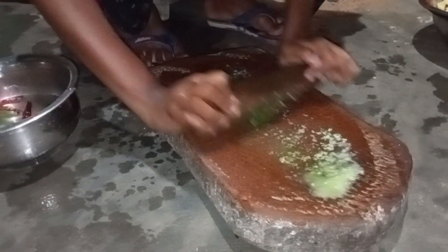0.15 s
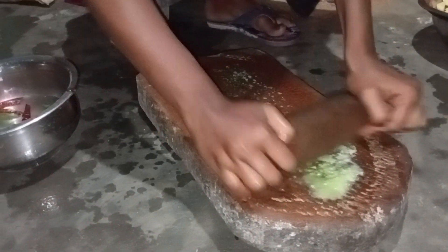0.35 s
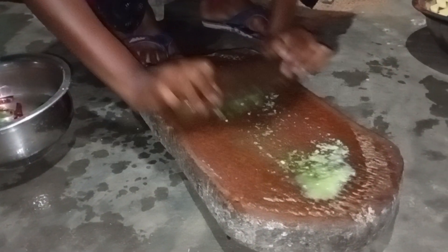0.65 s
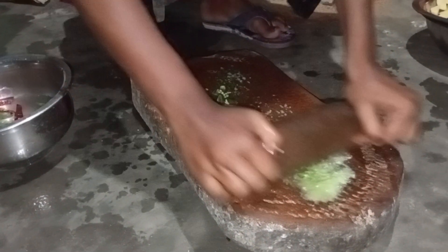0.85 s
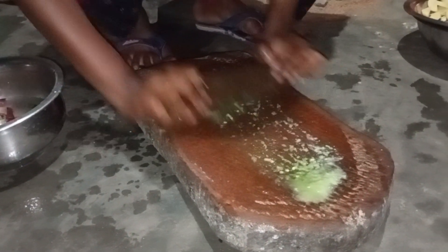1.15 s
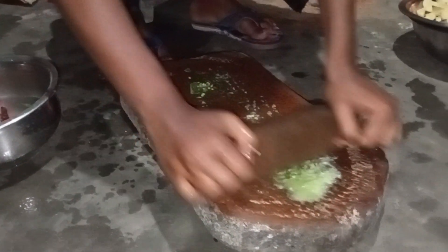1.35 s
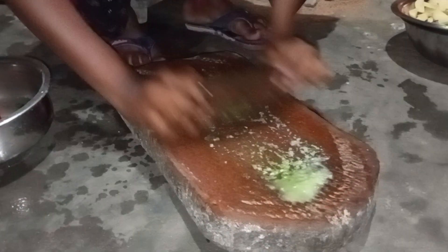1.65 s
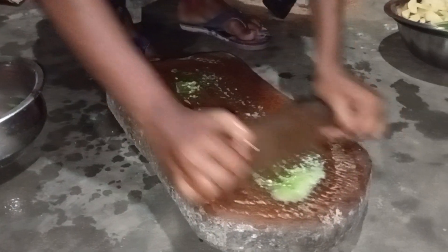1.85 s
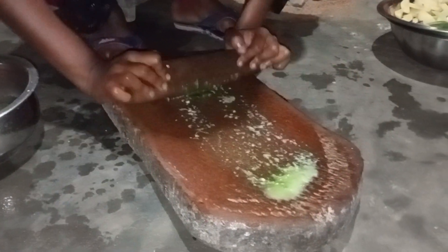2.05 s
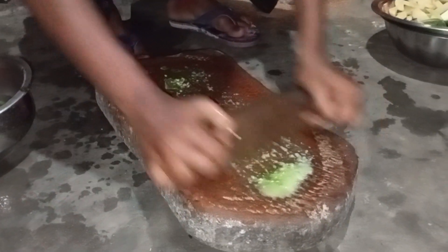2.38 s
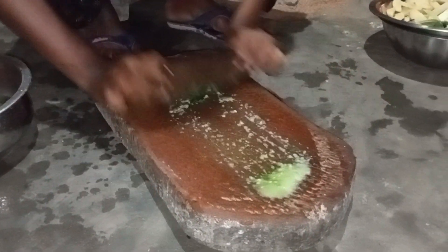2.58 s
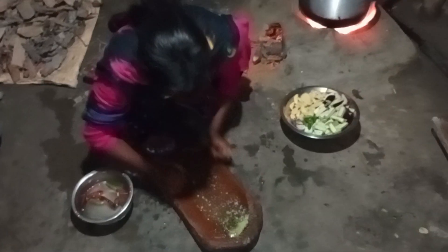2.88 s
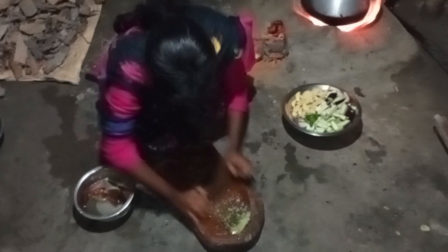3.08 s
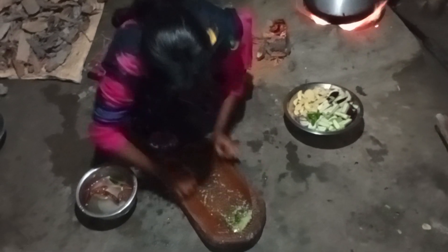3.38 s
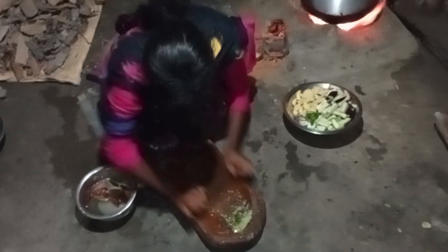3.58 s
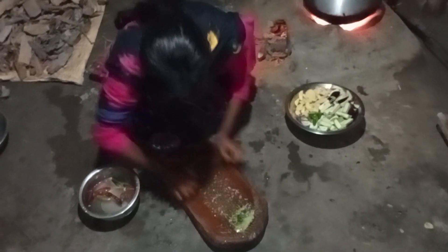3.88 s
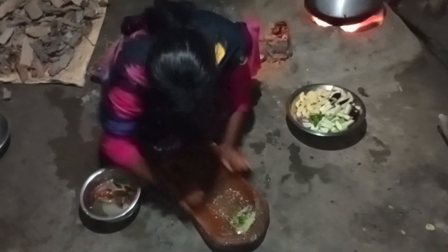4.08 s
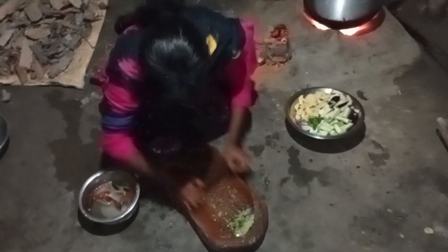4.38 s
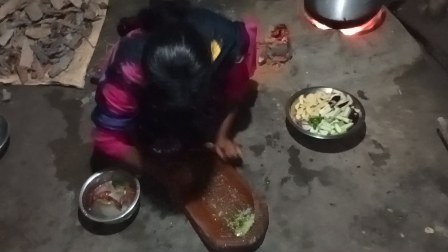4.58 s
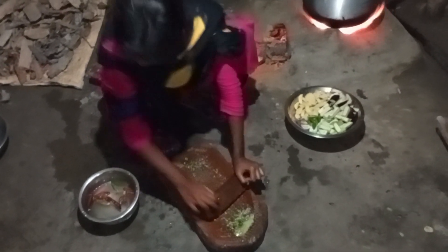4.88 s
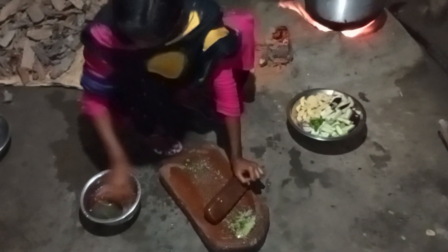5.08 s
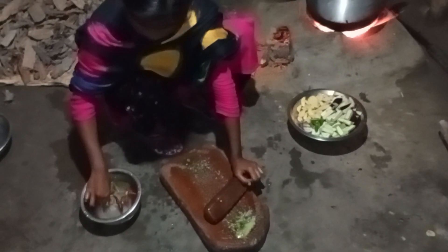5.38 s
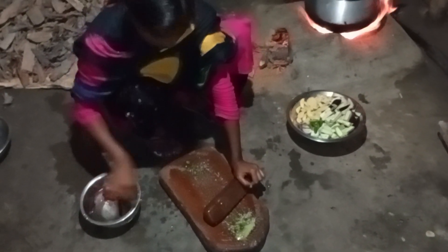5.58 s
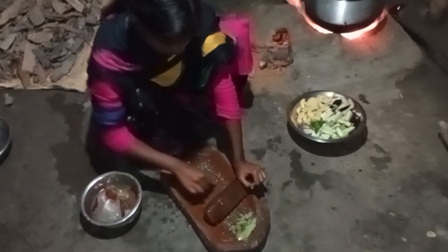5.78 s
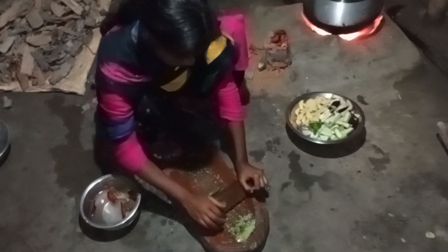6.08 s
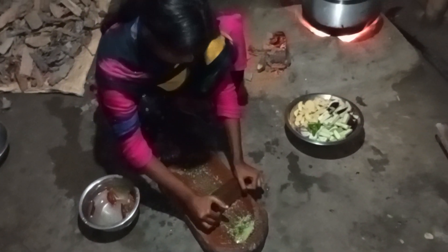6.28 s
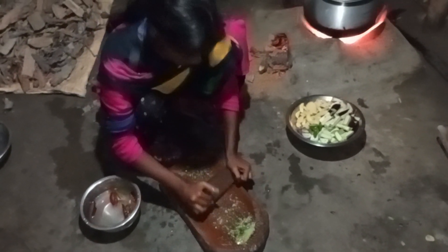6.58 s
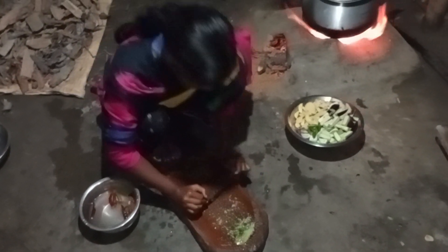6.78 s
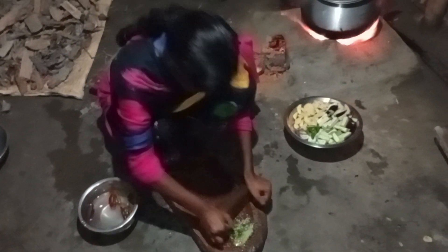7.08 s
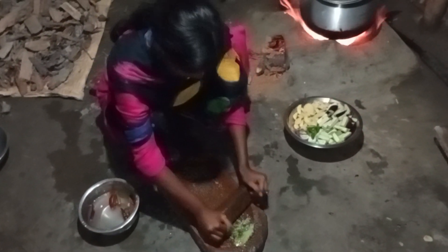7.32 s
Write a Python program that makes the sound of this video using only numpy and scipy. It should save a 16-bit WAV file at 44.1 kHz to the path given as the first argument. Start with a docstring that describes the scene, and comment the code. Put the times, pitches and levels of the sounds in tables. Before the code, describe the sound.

From 0 s a stone roller rubs wet paste on a stone slab, close to the microphone, in quick to-and-fro strokes, about four a second. The first is marked by a hard stone knock near 0.15 s, and the brightest wet scrape and snaps come around 0.4 s. Each stroke swells as gritty hiss, a dull rub and a hollow ringing around the same pitch, with a low rumble, motor hum and short bassy swells below. Bangles tick lightly at 1.5 s. From about 2.8 s the grinding is softer, with more slab boom and less rumble; a faint cricket trills from 3.2 to 4.5 s. After 4.8 s strokes pause: soft scuffs, a tapped steel bowl and droning water from 5.1 s, the cricket again near 6.2 s. Bangles jingle loudly at 6.4 s, a few weaker strokes and a firm knock at 6.9 s follow, and bangles jingle again at 7.4 s.

```python
"""A stone roller grinds wet paste on a stone slab, to and fro at first, over a low rumble and a motor's hum. Each
stroke is noise shaped by the roller's speed; it drives the roller's modes and the slab into sound. Knocks and paste
snaps, decaying modes and short bursts, occur throughout, and short low swells up to 2.5 s. Bangles jingle from 1.5 s,
a cricket trills faintly from 3.2 s and again near 6.2 s. From 4.8 s the strokes pause: a hand dips into a steel bowl
of water, tapped and droning in its modes; near 6.5 s bangles jingle loudly and a few more strokes follow."""
import sys
import numpy as np
from scipy import signal
from scipy.io import wavfile

SR = 44100
rng = np.random.default_rng(int(sys.argv[2]) if len(sys.argv) > 2 else 0)


def dump_mix(stems):
    """Bounce the given channels to the path in sys.argv[1] as a 16-bit WAV at rate SR."""
    frames = np.atleast_2d(stems).T  # one column per channel
    limited = np.clip(frames, -1, 1)  # hard clip at full scale
    pcm = np.round(limited * 32767).astype(np.int16)
    wavfile.write(sys.argv[1], SR, pcm)


N = 328545
SWITCH_S = 2.75   # the left-right balance of the knocks and the level of the upper notes switch


def from_db(db):
    """Decibels to an amplitude ratio."""
    return 10 ** (np.asarray(db) / 20)


def rms_one(x):
    """Normalise to unit effective value."""
    return x / np.sqrt(np.mean(x ** 2) + 1e-20)


def in_time(rows):
    """Linear interpolation of each column between the times in the first."""
    s, *columns = np.transpose(rows)
    return [np.interp(np.arange(N) / SR, s, c) for c in columns]


def at_hz(points, hz):
    """Interpolation of a spectrum along log frequency."""
    points = np.array(points)
    return np.interp(np.log(hz), np.log(points[:, 0]), points[:, 1])


def sides(lean_db):
    """Level difference between the ears: left and right gains."""
    return from_db(np.array([lean_db, -lean_db]) / 2)


def later(x, lag):
    """Interaural delay: the right side hears it lag samples after the left."""
    return np.array([x[0], np.r_[np.zeros(lag), x[1, :-lag]]])


def white():
    """White noise, two pairs of independent rows."""
    return rng.standard_normal((2, 2, N))


def drift(corner_hz):
    """Slow random modulation: noise at every 40th sample through a double one-pole low-pass; spread 1."""
    r = np.exp(-80 * np.pi * corner_hz / SR)
    noise = rng.standard_normal(N // 40 + 2002)
    slow = signal.lfilter([1], [1, -2 * r, r * r], noise)[2000:]   # the filter has settled
    return np.interp(np.arange(N) / 40, np.arange(len(slow)), rms_one(slow))


def ring(clicks, hz, t60):
    """Damped resonance: a unit click sets a sine of height 1 ringing, 60 dB down after t60 seconds."""
    r, w = from_db(-60 / (t60 * SR)), 2 * np.pi * hz / SR
    return signal.lfilter([0, np.sin(w)], [1, -2 * r * np.cos(w), r * r], clicks + 1e-18)


def grains(per_s, spread_db):
    """Shot noise: random clicks of uneven size, two independent rows; rms 1."""
    sizes = from_db(spread_db * np.minimum(rng.exponential(1, (2, N)), 5))
    signs = rng.choice([-1, 1], (2, N))
    return rms_one(sizes * signs * (rng.random((2, N)) < per_s / SR))


# Likeness of the two sides. Each row: frequency in Hz, left-right likeness from -1 to 1.
LIKENESS = [(100, 0.95), (300, 0.96), (700, 0.73), (1500, 0.14), (3000, 0.38), (8000, 0.1), (14000, 0.13)]
# Balance of the two sides. Each row: frequency in Hz, left-right difference in dB.
LEAN = [(100, -0.5), (400, 1.5), (1200, -4), (3000, 2), (9000, -3.5), (14000, -5.5)]


def coloured(spectrum, patchy_db, drive):
    """Band synthesis: near third-octave bands of drive, each with its level, flicker, likeness and lean; rms 1."""
    out, together = 0, drift(5.9)
    low, high = spectrum[0][0], min(spectrum[-1][0], 19000)
    edges = np.geomspace(low, high, num=2 + int(3 * np.log2(high / low)))
    for k, band in enumerate(zip(edges, edges[1:])):
        band_pass = signal.butter(2, band, "band", fs=SR, output="sos")
        mid, side = signal.sosfilt(band_pass, drive[k % 2])   # neighbouring bands use different pairs
        hz = np.sqrt(band[0] * band[1])
        alike = np.clip(at_hz(LIKENESS, hz), -1, 1)
        flicker_db = patchy_db * (.5 * together + drift(17.0))
        gain = from_db(at_hz(spectrum, hz) + flicker_db)
        pair = np.sqrt(1 + alike) * mid + np.sqrt(1 - alike) * side * [[1], [-1]]
        out = out + gain * pair * sides(at_hz(LEAN, hz))[:, None]
    return rms_one(out)


def swell(s, hold_s, rise_s, fade_db_per_s):
    """Event envelope, one row each: a smooth rise up to s, a hold, then an exponential fade."""
    late = np.arange(0, N, 32) / SR - np.asarray(s)[:, None]
    rise = np.sin(np.pi / 2 * np.clip(late / rise_s + 1, 0, 1)) ** 2
    after_hold = np.maximum(late - np.reshape(hold_s, (-1, 1)), 0)
    return rise * from_db(-after_hold * np.reshape(fade_db_per_s, (-1, 1)))


def level(rest_db, *groups):
    """Energy summation: the powers of (shape, dB) event groups add up over a resting level; gives a gain in time."""
    power = from_db(rest_db) ** 2 + sum(from_db(db) ** 2 @ shape ** 2 for shape, db in groups)
    return np.interp(np.arange(N) / 32, np.arange(len(power)), np.sqrt(power))


# Roller strokes. Each row: fastest moment in seconds, speeding up in seconds, slowing in seconds, grit hiss in dB,
# dull rub in dB, roller song in dB, song gain over the stroke in dB, slab boom in dB, main note in Hz.
STROKES = [(0.083, 0.025, 0.26, -40, -49.5, -74, -9, -72, 1260),
           (0.315, 0.11, 0.22, -39, -44.5, -62, 10, -72, 1280),
           (0.38, 0.037, 0.054, -28.5, -39, -42, -8.5, -58, 1260.0),
           (0.63, 0.18, 0.25, -47, -56, -49, -21, -60, 1270),
           (0.69, 0.061, 0.092, -37, -48, -75, 5, -55, 1270),
           (0.874, 0.15, 0.15, -34, -44, -35.5, -22, -63, 1270.0),
           (1.192, 0.22, 0.084, -37.5, -49.5, -29, -57, -60, 1270),
           (1.392, 0.19, 0.14, -36, -47.5, -33.5, -32, -63, 1290),
           (1.669, 0.21, 0.13, -39, -52.5, -48, -17, -72, 1280.0),
           (1.878, 0.16, 0.13, -36.5, -47, -39, -14.5, -64, 1270.0),
           (2.148, 0.17, 0.13, -38, -51, -36.5, -31, -62, 1290),
           (2.375, 0.16, 0.12, -37, -46.5, -23.5, -58, -53.5, 1290.0),
           (2.632, 0.15, 0.15, -40, -52, -50.5, -7, -57, 1310.0),
           (2.798, 0.072, 0.064, -43, -57.5, -67, -22, -53.5, 1260.0),
           (2.996, 0.17, 0.17, -42.5, -65, -54, -10, -54, 1240.0),
           (3.244, 0.15, 0.17, -43, -55.5, -51, 9.5, -49.5, 1240.0),
           (3.538, 0.15, 0.18, -46.5, -63, -38, -32, -51.5, 1230.0),
           (3.74, 0.11, 0.23, -43.5, -57, -43.5, -4.5, -49, 1260.0),
           (4.042, 0.14, 0.2, -44.5, -63, -44.5, -20, -49.5, 1250.0),
           (4.295, 0.16, 0.14, -42.5, -54.5, -40, -5.5, -46.5, 1240.0),
           (4.548, 0.11, 0.26, -45.5, -75, -56.5, 7.5, -48.5, 1250.0),
           (4.783, 0.11, 0.18, -46, -56.5, -46.5, 5.5, -53, 1240.0),
           (6.479, 0.13, 0.21, -45.5, -64, -46.5, -4, -73, 1250),
           (6.68, 0.37, 0.19, -57.5, -51.5, -48, -3, -54.5, 1250),
           (7.07, 0.15, 0.2, -60, -57, -52.5, 7, -74, 1240),
           (7.135, 0.11, 0.21, -44, -48, -60, -13, -67, 1240.0)]
# Sudden wet scrapes and bursts of hiss. Each row: start in seconds, hold in seconds, fade in dB per second,
# hiss in dB, dull rub in dB, slab shake in dB.
TOUCHES = [(0.292, 0.013, 148.5, -36, -45, -76), (0.389, 0.0063, 305, -33, -55, -66),
           (0.409, 0.0033, 403, -32, -61, -70), (1.77, 0.019, 151, -53, -62, -68),
           (4.615, 0.1, 152, -50.5, -57.5, -62.5), (5.094, 0.071, 171, -42.5, -48, -50),
           (5.188, 0.032, 23, -52.5, -54, -66), (5.63, 0.0081, 193.5, -46.5, -47, -55.5),
           (5.832, 0.021, 92, -63, -76, -80.5), (5.848, 0.016, 124.5, -67, -54, -58.5),
           (5.914, 0.41, 58, -59, -64.5, -72.5), (6.336, 0.045, 139, -45, -44.5, -46),
           (6.506, 0.03, 16, -56.5, -62, -54), (6.91, 0.023, 197, -50.5, -49.5, -52),
           (7.124, 0.021, 190, -37.5, -61, -68), (7.357, 0.026, 69, -55, -52, -50.5),
           (7.391, 0.037, 157, -45, -60, -65)]
# The roller rides over lumps and shakes the slab. Each row: full level in seconds, hold in seconds, level in dB.
BUMPS = [(0.078, 0.0083, -54), (0.149, 0.0032, -39), (0.24, .01, -53.5), (0.421, 0.015, -48.5),
         (0.559, 0.047, -48.5), (0.682, 0.0079, -57.5), (0.74, 0.035, -52), (0.84, 0.0092, -48.5),
         (0.92, 0.019, -42.5), (1.064, 0.052, -54.5), (1.343, 0.01, -52.5), (1.447, 0.015, -47.5),
         (1.526, 0.044, -53), (1.92, 0.024, -45), (2.053, 0.042, -47), (2.412, 0.018, -44.5),
         (2.487, 0.0077, -50.5), (2.536, 0.032, -50.5), (2.762, 0.0064, -51.5), (3.196, 0.017, -58),
         (3.297, 0.024, -53.5), (3.44, 0.025, -60), (3.79, 0.041, -51.5), (4.125, 0.023, -56),
         (4.288, 0.037, -69), (4.646, 0.058, -56.5), (4.76, 0.013, -51.5), (7.22, 0.017, -53)]
# each sound grows as the roller's speed to this power
HISS_POWER, RUB_POWER, SONG_POWER, BOOM_POWER = 2.78, 2.35, 4.54, 1.3
REST_HISS_DB, REST_RUB_DB, REST_SONG_DB, REST_SHAKE_DB, REST_BOOM_DB = -64.5, -68.5, -99, -71, -61.5
SCRAPE_RISE_S, BUMP_RISE_S, BUMP_FADE_DB_PER_S = 0.0039, .015, 396.5
SHAKE_UNDER_RUB_DB = -17.5


def stroke_gains():
    """Friction noise grows with sliding speed, here half a sine: gains of hiss, dull rub, song, shake and boom."""
    fastest, rise_s, fall_s, hiss_db, rub_db, song_db, gain_db, boom_db, _ = np.transpose(STROKES)
    t = np.arange(0, N, 32) / SR
    strokes_s = zip(fastest - rise_s, fastest, fastest + fall_s)
    done = np.array([np.interp(t, knots, [0, .5, 1]) for knots in strokes_s])   # share of the stroke
    speed = np.maximum(np.sin(np.pi * done), 0) * (done < 1)
    s, hold_s, fade, scrape_db, scrape_rub_db, scrape_shake_db = np.transpose(TOUCHES)
    scrape = swell(s + SCRAPE_RISE_S, hold_s, SCRAPE_RISE_S, fade)
    bump_s, bump_hold_s, bump_db = np.transpose(BUMPS)
    bump = swell(bump_s, bump_hold_s, BUMP_RISE_S, BUMP_FADE_DB_PER_S)
    song_shape = speed ** SONG_POWER * from_db(gain_db[:, None] * done)
    return (level(REST_HISS_DB, (speed ** HISS_POWER, hiss_db), (scrape, scrape_db)),
            level(REST_RUB_DB, (speed ** RUB_POWER, rub_db), (scrape, scrape_rub_db)),
            level(REST_SONG_DB, (song_shape, song_db)),
            level(REST_SHAKE_DB, (speed, rub_db + SHAKE_UNDER_RUB_DB), (scrape, scrape_shake_db), (bump, bump_db)),
            level(REST_BOOM_DB, (speed ** BOOM_POWER, boom_db)))


# Spectrum of the bright hiss. Each row: frequency in Hz, relative level in dB per Hz.
GRIT = [(2350, -47), (4000, -11), (4360, -19), (5280, -10.5), (5730, -7), (7140, -3.5), (8300, 1),
        (9220, 3), (10400, -0.5), (14900, -11.5), (15600, -17), (16000, -27)]
CLICKS_PER_S, RING_CYCLES = 1300, 90   # mean rate, cycles to ring 60 dB down
BRIGHT_LEAN_DB = -4.5   # left-right


def tonal_hiss():
    """Resonant shot noise: bright, uneven, slightly tonal hiss from random clicks in many narrow resonances."""
    clicks = grains(CLICKS_PER_S, spread_db=4.5) * from_db(5.0 * drift(45))
    dealt = rng.integers(0, 36, N)   # each click goes to one resonance
    out = 0
    for k, hz in enumerate(np.geomspace(4000, 14500, 36)):
        gain = from_db(at_hz(GRIT, hz)) * np.sqrt(hz)
        out = out + gain * ring(clicks * (dealt == k), hz, RING_CYCLES / hz)
    return rms_one(out) * sides(BRIGHT_LEAN_DB)[:, None]


def wet(hiss, dull_db):
    """Viscous damping: the wetter and duller the rubbing, the less of the top octave is left."""
    damped = signal.sosfilt(signal.butter(2, 9500.0, fs=SR, output="sos"), hiss)
    share = np.clip((dull_db + 14) / 14, 0, 1)
    return (1 - share) * hiss + share * damped


# Spectrum of the dull rub. Each row: frequency in Hz, relative level in dB per Hz.
DULL = [(940, -56.5), (1600, -7), (2230, -7), (2960, 10), (3220, 3), (4350, -9), (5000, -6.5),
        (6500, -34.5), (11000, -120)]
# Upper notes that stand out of the dull rub. Each row: frequency in Hz, mean level in dB, t60 in seconds.
RUB_NOTES = [(2713, -22, 0.034), (2835, -17.5, 0.02)]
# How far these notes also follow the roller's song, in dB: before and after the switch.
NOTES_WITH_SONG_DB = [-19, -2]
TONAL_HISS_DB = -9   # against the plain hiss
JUDDER_DB, JUDDER_HZ = 0.57, 84   # the roller sticks and slips on the pitted stone: spread, corner of the flutter


def grinding(hiss, rub, song):
    """Granular friction: dense random clicks coloured into hiss and dull rub, with two resonant upper notes."""
    sand = np.array([grains(per_s=7400.0, spread_db=-0.5), grains(per_s=8300.0, spread_db=-1.0)])
    bright = coloured(GRIT, 2.63, sand) + from_db(TONAL_HISS_DB) * tonal_hiss()
    grit = hiss * wet(bright, 20 * np.log10(rub / hiss))
    grit += rub * from_db(-4.5) * coloured(DULL, 1.0, sand)
    before_db, after_db = NOTES_WITH_SONG_DB
    switched = np.arange(N) > SWITCH_S * SR
    notes_gain = rub + song * from_db(np.where(switched, after_db, before_db))
    grit += notes_gain * sum(from_db(db + 3.5 * drift(12)) * rms_one(ring(sand[1], hz, t60))
                             for hz, db, t60 in RUB_NOTES)
    return grit * from_db(JUDDER_DB * drift(JUDDER_HZ))


# Modes of the stone roller, as knocks ring them (sing() evens and lengthens them).
# Each row: frequency in Hz, relative level in dB, t60 in seconds.
ROLLER = [(684, -31, 0.055), (1080, -32, .05), (1241, 3, 0.065), (1311, -12, 0.12), (1410, -16, 0.11),
          (1480, -14.5, 0.075), (1615, -12.5, 0.033), (1880, -28, 0.065), (2050, -23, .03),
          (2350, -24, 0.09), (2515, -17, .11), (2670, -14, 0.1), (2850, -26, 0.033), (2960, -38, .03)]


def sing(drive):
    """Modal resonance: the roller's fixed modes under a steady drive, with a rough band where upper modes crowd."""
    crowd = from_db(1.0) * ring(drive, 2900.0, 0.038)
    return crowd + sum(from_db(.6 * db) * ring(drive, hz, 2.0 * t60) for hz, db, t60 in ROLLER)


def roller_ring(song):
    """Friction drives the roller's modes without pause; the grip bends its main note, slow noise on a moving carrier."""
    mid, side = rng.standard_normal((2, 2, N)) * from_db(1.8 * drift(25))
    friction = mid[:, None] + 0.3 * side[:, None] * [[1], [-1]]
    main_hz = in_time(np.array(STROKES)[:, [0, -1]])[0] * (1 + 0.013 * drift(12))
    turn = 2 * np.pi * np.cumsum(main_hz) / SR
    r = np.exp(-np.pi * 82.0 / SR)
    unit_gain = (1 - r * r) ** 1.5 / np.sqrt(1 + r * r)   # keeps the noise power
    slow = signal.lfilter([unit_gain], [1, -2 * r, r * r], friction * song)
    weak = sing(friction[0] * song) / np.sqrt(np.mean(sing(friction[0]) ** 2))
    return slow[0] * np.cos(turn) + slow[1] * np.sin(turn) + from_db(-3.5) * weak


# Knocks, mostly of the roller on the slab; the row at 2.775 s is a broad click. Each row: start in seconds,
# relative level in dB, hardness in dB, chatter in dB, brightness in dB.
KNOCKS = [(0.1432, -4.5, 3, -15, -30), (0.161, -20.5, 2, -13.5, -28), (0.251, -38, 8, -6, -45),
          (0.5855, -37.5, 8, -13, -27), (0.738, -32.5, 14, -8, -53), (0.9145, -22, 11, -24, -52),
          (0.929, -37, 5, -8, -45), (1.5217, -52, 6, -18, -29), (2.482, -49.5, -1, -9, -31),
          (2.5492, -52, 11, -24, -18), (2.775, -43.5, 9.5, -20, -24), (3.1884, -30, 12, -20, -49),
          (3.246, -33.5, -3, -29, -36), (3.599, -42, 15, -9, -42), (4.121, -34.5, 7, -5, -40),
          (4.478, -54, 0, -1, -30), (6.789, -28.5, 5, -14, -34), (6.843, -43.5, 1, -17, -42),
          (6.924, -16, 3, -15, -26.5), (7.227, -31.5, 12, -17, -55)]
# Left-right difference of the knocks in dB: before and after the switch.
KNOCK_LEAN_DB = [3.5, -1.3]
HARD_DAMPS = 0.45   # dB of quicker dying of the main note per dB of hardness


def knocks():
    """Impact of two stones rings the roller's modes, held up while the stones press together; a rough chatter follows.
    Harder blows lift the weak modes and die sooner, brighter ones lift the upper modes; each side has its own mix."""
    out, length = np.zeros((2, N)), SR // 5
    t = np.arange(length) / SR
    chance = rng.standard_normal((len(KNOCKS), 2, len(ROLLER), 1))
    rough = rng.standard_normal((len(KNOCKS), 2, length))
    hz, level_db, t60 = np.transpose(ROLLER)[:, :, None]
    weak, upper = level_db < -5, hz > 2000
    contact = np.sin(np.pi / 2 * np.minimum(t / 0.0024, 1)) ** 2
    clack = signal.butter(4, [1700, 3000], "band", fs=SR, output="sos")
    thud = signal.butter(2, [550, 2100], "band", fs=SR, output="sos")
    for (s, knock_db, hard_db, chatter_db, bright_db), own, noise in zip(KNOCKS, chance, rough):
        damping = from_db(HARD_DAMPS * max(hard_db, 0) * ~weak)
        decay = np.maximum(t - 0.0073 * ~weak, 0) * damping   # strong modes wait 7.3 ms
        lift_db = weak * (hard_db + 2 * own) + upper * (bright_db + 25.0)
        gain = from_db(level_db + lift_db - 60 * decay / t60)
        note = np.sum(gain * np.sin(2 * np.pi * hz * t), axis=1)
        chatter = rms_one(ring(noise, 1250.0, 0.07))
        chatter += from_db(bright_db + 25) * rms_one(signal.sosfilt(clack, noise))
        note += from_db(chatter_db - 60 * t / 0.19) * chatter
        slab_answer = rms_one(signal.sosfilt(thud, noise[0]))
        note += from_db(hard_db - 20.0 - 60 * t / 0.072) * slab_answer
        lean = sides(KNOCK_LEAN_DB[int(s > SWITCH_S)])[:, None]
        at = round(s * SR)
        out[:, at:at + length] += from_db(knock_db - 3.0) * lean * note * contact
    return out


# Short rough tones as stone drags on stone. Each row: full level in seconds, hold in seconds, level in dB,
# frequency in Hz, t60 of the resonance in seconds.
GROANS = [(2.027, 0.036, -59.5, 1020, 0.037), (2.418, 0.028, -53.5, 1037, 0.03),
          (2.419, 0.028, -51.5, 1476, 0.058), (4.477, 0.018, -62.5, 1040, 0.065),
          (4.646, 0.077, -54.5, 862, 0.043), (4.75, 0.032, -49.5, 1520, 0.027),
          (5.098, .02, -51.5, 870, 0.033), (5.638, .015, -60, 2850, .05), (5.654, .015, -57, 1950, .06),
          (5.855, .015, -65, 1100, .05), (6.065, .05, -68, 1870, .08), (6.13, .07, -75, 1820, .08),
          (6.215, .035, -70, 1780, .08), (6.555, 0.16, -56, 2804, 0.02), (6.345, 0.029, -51.5, 850, 0.054),
          (6.351, 0.036, -53, 1868, 0.059), (6.653, 0.083, -54.5, 1510, .07)]


def groans():
    """Resonant filtering: each is noise held in one resonance for a moment."""
    noise = rng.standard_normal(N)
    out = 0
    for s, hold_s, db, hz, t60 in GROANS:
        gain = level(-120, (swell([s], hold_s, 0.025, 640), [db]))
        out = out + gain * rms_one(ring(noise, hz, t60))
    return out


# Spectrum of the shaken slab. Each row: frequency in Hz, relative level in dB per Hz.
SHAKE = [(220, -3.5), (380, 1), (630, -7), (918, -10), (1110, -2), (1240, -12), (1750, -13.5), (1900, -11),
         (2470, -41.5), (4180, -120)]


def slab_shake(shake):
    """Structure-borne noise: the slab shaken by strokes, scrapes and lumps, as flickering coloured noise."""
    return shake * coloured(SHAKE, 2.2, white())


def boom(gain, modes):
    """Modal filtering: noise held in a few low modes."""
    noise = rng.standard_normal(N)
    return gain * rms_one(sum(from_db(db) * ring(noise, hz, t60) for hz, db, t60 in modes))


# Modes of the slab. Each row: frequency in Hz, relative level in dB, t60 in seconds.
SLAB = [(189.7, -27.5, 0.96), (244.5, 5.5, 0.09), (290.5, -3.5, 0.16), (427, -20.5, 0.18),
        (524, -16.5, 0.1206)]


def slab_drone(slab_boom):
    """Modal excitation: the moving roller keeps the slab's low modes booming."""
    return boom(slab_boom, SLAB)


# Paste and water snapping. Each row: start in seconds, relative level in dB, pitch in Hz.
SNAPS = [(0.0748, -20, 9710), (0.1281, -23, 9850), (0.1435, -24, 9000), (0.1755, -23, 7750),
         (0.295, -21, 8840), (0.3777, -11, 8000), (0.39, -13, 7040), (0.4135, -6, 8630),
         (0.6823, -28, 9740), (0.8135, -23, 9250), (2.7816, -27, 9280), (4.5057, -34, 10300),
         (5.0928, -38, 5460), (5.6351, -40, 8280), (5.8514, -42, 9260), (6.3385, -38, 8670),
         (6.9122, -39, 9740), (7.1282, -25, 10200), (7.3667, -47, 7180)]


def snaps():
    """Impulsive release: each snap is a wide crack around its pitch with a short fizz behind it."""
    out, t = np.zeros(N), np.arange(SR // 20) / SR
    puffs = rng.standard_normal((len(SNAPS), len(t)))
    for (s, db, hz), puff in zip(SNAPS, puffs):
        wide = signal.butter(2, [hz / 2.5, min(hz * 1.6, 15500)], "band", fs=SR)
        crack = np.sin(2 * np.pi * hz * t) * np.exp(-t / .00025)
        fizz_fade = .5 * np.exp(-t / 0.00033) + 0.046 * np.exp(-t / 0.0042)
        fizz = signal.lfilter(*wide, puff) * fizz_fade
        at = round(s * SR)
        out[at:at + len(t)] += from_db(db - 3.0) * (crack + fizz)
    return out


# Bangles touching. Each row: start in seconds, then relative level in dB of the low, middle and high bangle.
JINGLES = [(1.4544, -35, -39, -50), (1.476, -50, -39, -47), (1.497, -55, -41, -63), (5.134, -55, -48, -50),
           (5.174, -51, -37.5, -44), (5.6494, -62, -55, -65), (5.862, -70, -58, -56.5),
           (6.338, -55, -46, -56), (6.388, -32, -34, -35), (6.405, -40, -41, -44), (6.425, -48, -50, -50),
           (6.442, -25, -38, -43), (6.487, -44, -34.5, -43), (6.51, -52, -51, -62),
           (7.396, -28, -43, -40.5), (7.416, -45, -45, -52), (7.436, -45, -44, -39)]
# Modes of the three bangles, one list each. Each row: frequency in Hz, relative level in dB, t60 in seconds.
BANGLES = [
    [(7210, 0, .06), (7310, -8, .04)],
    [(8250, -3, .04), (8420, -4, .03), (8560, -2, .045)],
    [(9780, -1, .05), (9980, -2, .03), (10150, -6, .03)],
]


def jingles(gain_db, spread_db, rattle_s):
    """Repeated impact: each touch is a short rattle of contacts that rings every mode of each bangle at its level."""
    at, out = [round(row[0] * SR) for row in JINGLES], np.zeros(N)
    fade = np.exp(-np.arange(SR // 10) / (rattle_s * SR))
    fade = fade / np.sqrt(np.sum(fade ** 2))
    for k, modes in enumerate(BANGLES):
        touch_db = np.array(JINGLES)[:, 1 + k]
        chance = rng.standard_normal((len(JINGLES), len(modes)))
        for (hz, mode_db, t60), own in zip(modes, chance.T):
            clicks = np.zeros(N)
            clicks[at] = from_db(touch_db + mode_db + gain_db + spread_db * own)
            contacts = signal.fftconvolve(clicks, fade)[:N] * rng.standard_normal(N)
            out += ring(contacts, hz, t60)
    return out


# Bowl knocked. Each row: start in seconds, level of the push in dB.
BOWL_TAPS = [(5.141, -30), (6.375, -36)]
# Modes of the bowl as it drones (taps ring longer). Each row: frequency in Hz, relative level in dB, t60 in seconds.
BOWL = [(298, -2, .11), (336, 0, .13), (372, -13, .08), (748, -17, .09), (947, -22, .1)]


def bowl_taps():
    """Soft impact: a knuckle pushes for under two milliseconds and rings the water-damped modes of the bowl."""
    push, soft = np.zeros(N), np.hanning(SR // 600)
    for s, db in BOWL_TAPS:
        at = round(s * SR)
        push[at:at + len(soft)] = from_db(db) * soft / soft.sum()
    return sum(from_db(db) * ring(push, hz, 1.45 * t60) for hz, db, t60 in BOWL)


# Water swings in the bowl and keeps it droning. Each row: full level in seconds, hold in seconds, level in dB.
SLOSHES = [(5.125, 0.011, -45), (5.266, 0.27, -47.5), (5.65, 0.015, -58.5), (5.878, 0.039, -51.5),
           (6.03, 0.088, -51.5), (6.349, 0.01, -47.5), (6.56, 0.013, -67), (6.862, 0.032, -47),
           (7.047, 0.012, -48.5), (7.224, 0.015, -52), (7.433, 0.022, -47)]
SLOSH_RISE_S, SLOSH_FADE_DB_PER_S = 0.066, 87


def slosh():
    """Modal excitation by moving water: noise in the bowl's modes swells and dies away with each swing."""
    s, hold_s, db = np.transpose(SLOSHES)
    return boom(level(-92, (swell(s, hold_s, SLOSH_RISE_S, SLOSH_FADE_DB_PER_S), db)), BOWL)


# Cricket bouts. Each row: full level in seconds, hold in seconds, level in dB.
CRICKET_BOUTS = [(3.24, 1.25, -73.5), (6.15, .8, -74.5)]
CRICKET_HZ, TRILL_HZ, PULSE_S = 5520, 21.35, 5.2   # whistle, pulses per second, time of one pulse's peak


def cricket():
    """Amplitude modulation: a thin whistle that throbs, its level wandering from pulse to pulse."""
    t = np.arange(N) / SR
    throb = np.maximum(np.cos(2 * np.pi * TRILL_HZ * (t - PULSE_S)), 0)
    s, hold_s, db = np.transpose(CRICKET_BOUTS)
    gain = level(-100.5, (swell(s, hold_s, 0.082, 300), db))
    whistle = np.sin(2 * np.pi * CRICKET_HZ * t)
    return gain * rms_one((throb + 0.32) * from_db(1.5 * drift(25)) * whistle)


KITCHEN_T60_S, WALL_CUT_HZ, KITCHEN_DB = 0.19, 1100, -12.5   # t60 before the walls' treble loss


def kitchen(x):
    """Reverberation by recirculation: eight feedback delays a side, duller on every round, stepped block by block."""
    out, dull = np.zeros((2, N)), np.exp(-2 * np.pi * WALL_CUT_HZ / SR)
    lags = (rng.uniform(0.012, 0.033, 16) * SR).astype(int)
    for k, lag in enumerate(lags):
        loop, gain, state = x.copy(), from_db(-60 * lag / SR / KITCHEN_T60_S), [0.]
        for i in range(lag, N, lag):
            back, state = signal.lfilter([gain * (1 - dull)], [1, -dull], loop[i - lag:i], zi=state)
            loop[i:i + lag] += back[:N - i]
        out[k % 2] += (loop - x) * (-1) ** (k // 2)
    return out


# Short low swells in the rumble. Each row: start in seconds, level in dB, pitch in Hz.
LOW_SWELLS = [(0.086, -32, 144), (0.312, -32, 137), (0.664, -37, 176), (1.3, -36, 121), (1.378, -42, 151),
              (1.521, -27.5, 196), (1.621, -38, 135), (1.905, -28, 181), (2.483, -26.5, 193)]
LOW_SWELL_CYCLES = 7.8   # to fall 60 dB


def low_swells():
    """Damped oscillation: a low note that dies in a few cycles."""
    out, t = np.zeros(N), np.arange(SR // 8) / SR
    for s, db, hz in LOW_SWELLS:
        at = round(s * SR)
        onset = np.minimum(t / 0.0027, 1)
        fade = from_db(db - 60 * t * hz / LOW_SWELL_CYCLES)
        out[at:at + len(t)] += fade * np.sin(2 * np.pi * hz * t) * onset
    return out


HUM_HZ, HUM_HALF_DB = 102.9, -61   # mean pitch of the motor line, mean level of the line at half of it


def hum(hum_db):
    """Periodic source: a motor line that wavers a little in pitch and level, with its half."""
    turn = 2 * np.pi * np.cumsum(HUM_HZ * (1 + 0.0046 * drift(5.8))) / SR
    wobble = from_db(1.95 * drift(4.4))
    lines = from_db(hum_db) * np.sin(turn) + from_db(HUM_HALF_DB) * np.sin(turn / 2)
    return np.sqrt(2) * wobble * lines


# Spectrum of the rumble. Each row: frequency in Hz, relative level in dB per Hz.
RUMBLE = [(18, -56.5), (30, -41), (81, 0), (102, 3), (146, 6), (214, -5.5), (326, -13.5), (380, -26),
          (420, -19), (550, -46), (920, -120)]
# Low notes of the room. Each row: frequency in Hz, relative level in dB, t60 in seconds.
ROOM_NOTES = [(104.14, -3, 0.46), (139.8, 1.5, 0.14), (164.1, -6, 0.49), (191.1, 0, 0.67),
              (212.8, -14, 0.67)]
# Low background. Each row: time in seconds, relative rumble level in dB, mean hum level in dB.
LOWS = [(0, -45.5, -52), (.5, -43, -45.5), (1.1, -42.5, -51.5), (1.5, -41.5, -50), (2.1, -45.5, -46.5),
        (2.7, -45, -52), (2.9, -51.5, -51), (4.6, -51.5, -57.5), (5.1, -53, -57.5), (5.7, -49, -57),
        (6.3, -51, -53), (6.45, -47, -54), (7.0, -51, -57), (7.45, -57, -56.5)]
RUMBLE_DB, ROOM_NOTES_DB = -1.5, -5   # both over the rumble level of the table


def low_background():
    """Broadband noise and room modes: a slowly changing rumble, notes at the room's resonances and the motor's hum."""
    rumble_db, hum_db = in_time(LOWS)
    rumble = from_db(rumble_db + RUMBLE_DB) * coloured(RUMBLE, 1.4, white())
    room_notes = boom(from_db(rumble_db + ROOM_NOTES_DB), ROOM_NOTES)
    return rumble + room_notes + hum(hum_db)


# Spectrum of the air. Each row: frequency in Hz, relative level in dB per Hz.
AIR = [(240, -54), (400, -34), (481, -22.5), (616, -19), (719, -3.5), (814, -47), (1330, -17), (3580, -28),
       (5780, -21.5), (11000, -21), (16000, -42.5)]
AIR_DB = -64


def air():
    """Stationary noise: a faint steady bed of coloured noise."""
    return from_db(AIR_DB) * coloured(AIR, 0.426, white())


STONE_LAG, GRIT_LAG = 5, 9   # samples by which the right side is late


def scene():
    """Superposition: direct sound with its left-right delays, the room's answer and the background add up."""
    hiss, rub, song, shake, slab_boom = stroke_gains()
    grit = grinding(hiss, rub, song)
    blows = knocks() + roller_ring(song) + groans()
    bright = snaps() + jingles(gain_db=1.5, spread_db=2.5, rattle_s=0.018) + cricket()
    middle = bowl_taps() + slosh() + slab_drone(slab_boom) + low_swells()
    room = from_db(KITCHEN_DB) * kitchen(blows.mean(axis=0) + bright + middle)
    stone = later(slab_shake(shake) + blows + middle * sides(-1.2)[:, None], STONE_LAG)
    treble = later(grit + bright * sides(BRIGHT_LEAN_DB)[:, None], GRIT_LAG)
    return stone + treble + room + low_background() + air()


def record(dry):
    """Band limiting: the deepest bass and the top are cut."""
    bass_cut = signal.sosfilt(signal.butter(2, 40.0, "high", fs=SR, output="sos"), dry)
    top_cut = signal.ellip(12, .5, 80, 15700, fs=SR, output="sos")   # passes up to 15700 Hz
    return signal.sosfilt(top_cut, bass_cut)


dry = scene()
out = record(dry)
dump_mix(out)
```